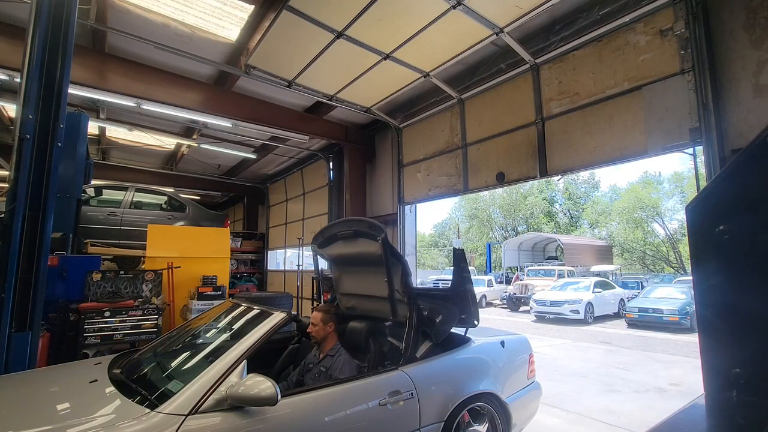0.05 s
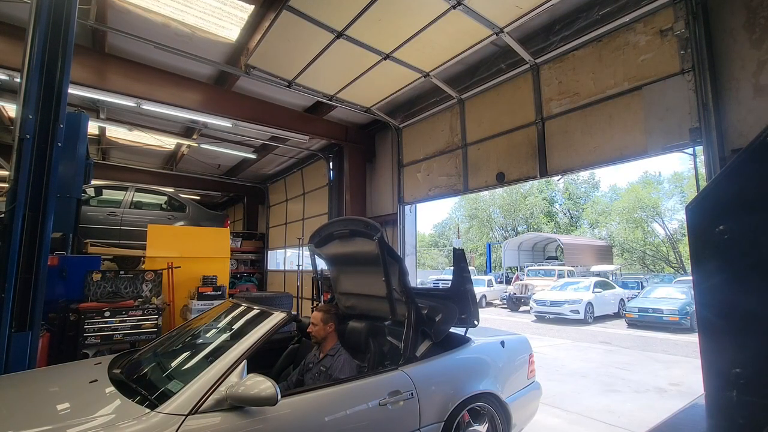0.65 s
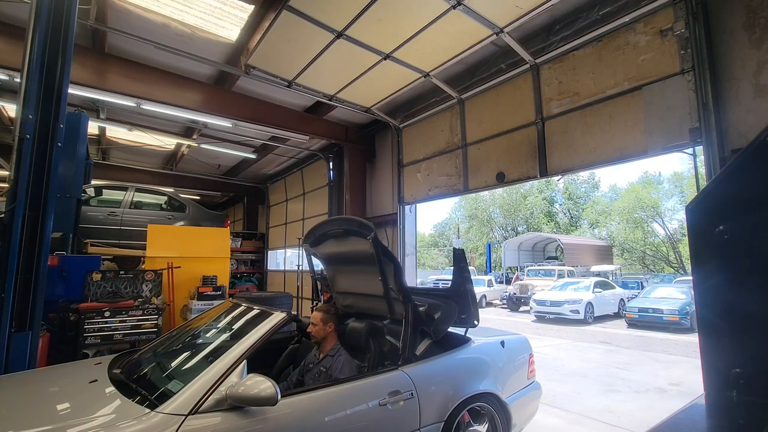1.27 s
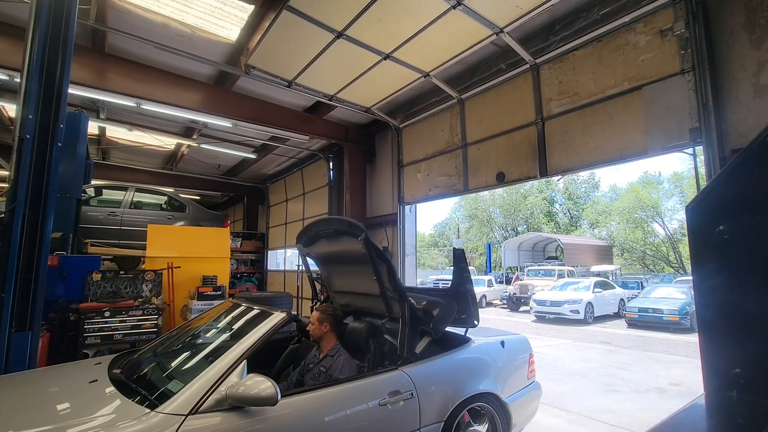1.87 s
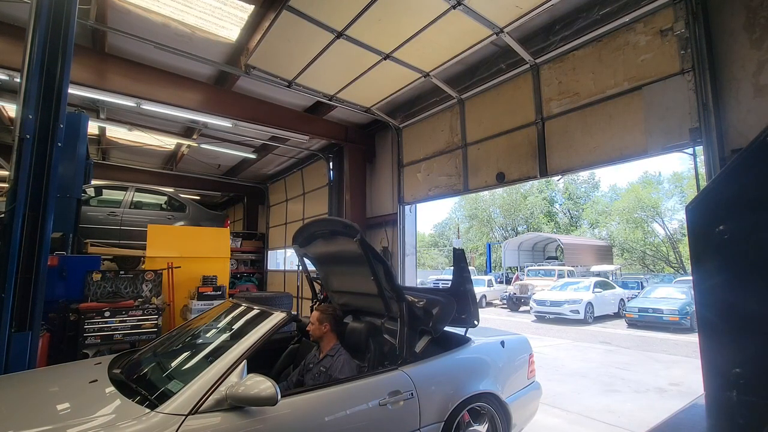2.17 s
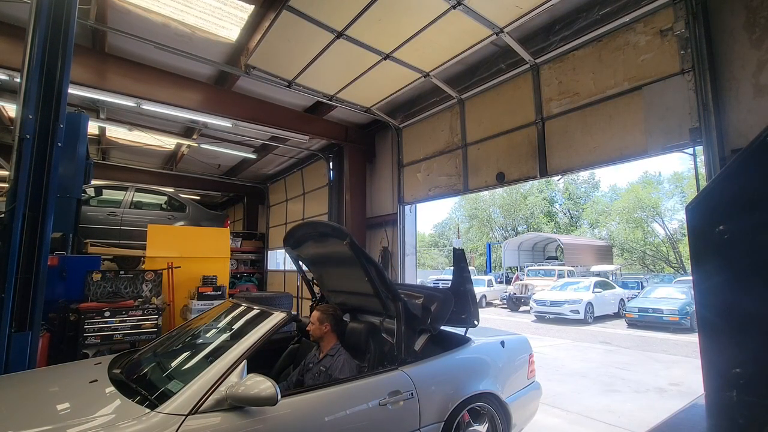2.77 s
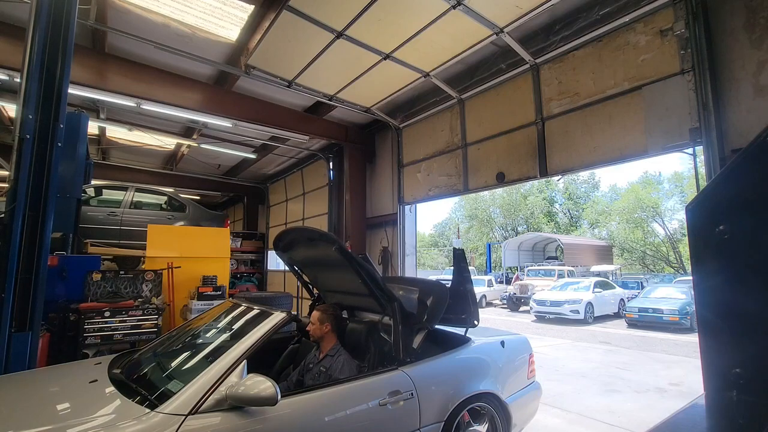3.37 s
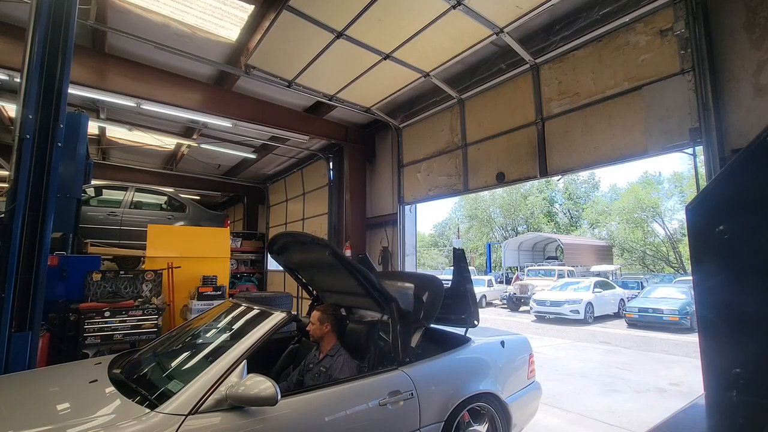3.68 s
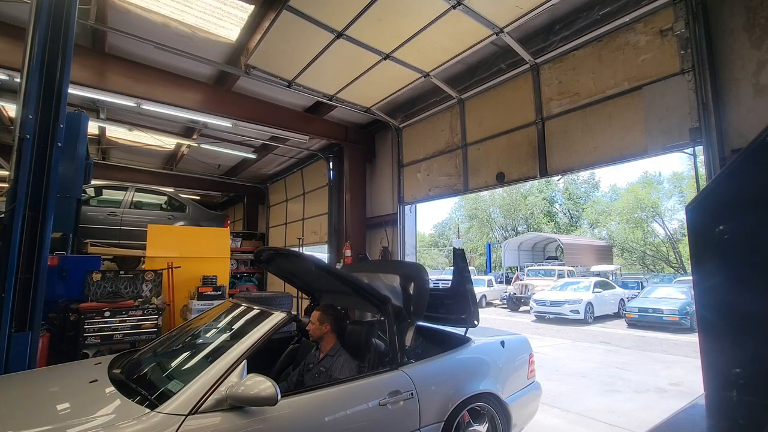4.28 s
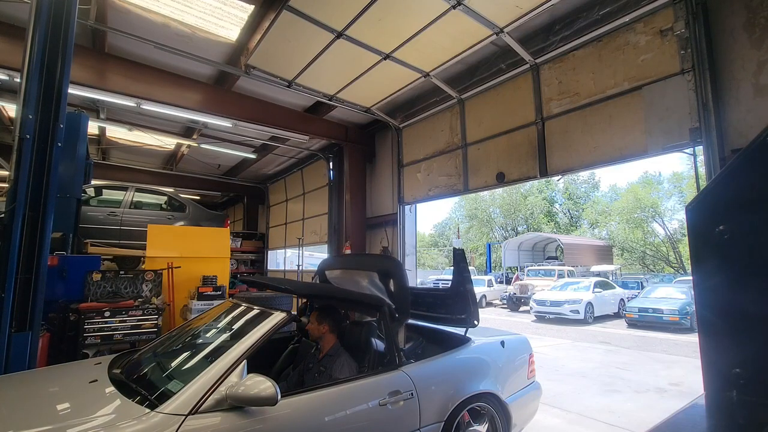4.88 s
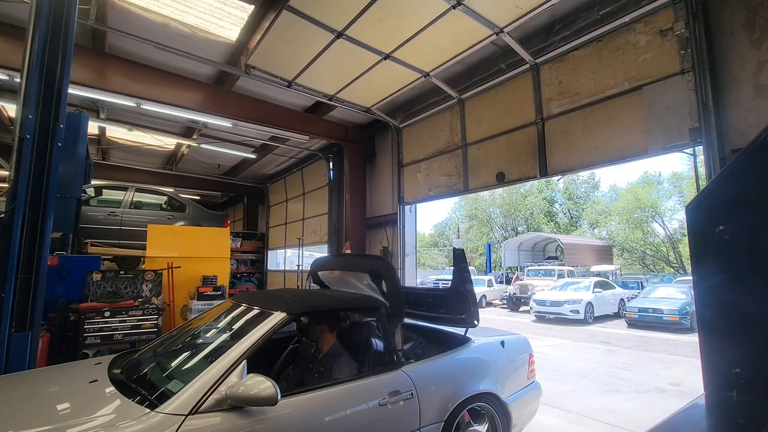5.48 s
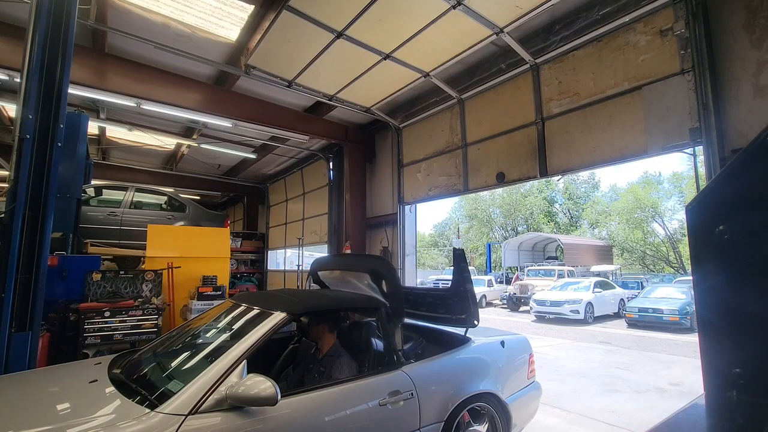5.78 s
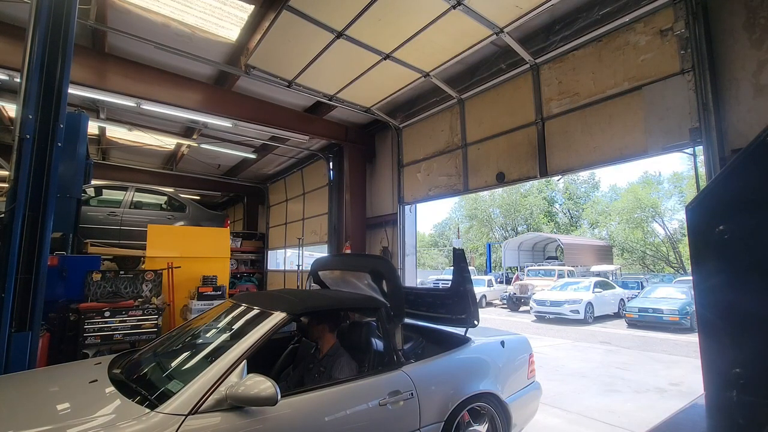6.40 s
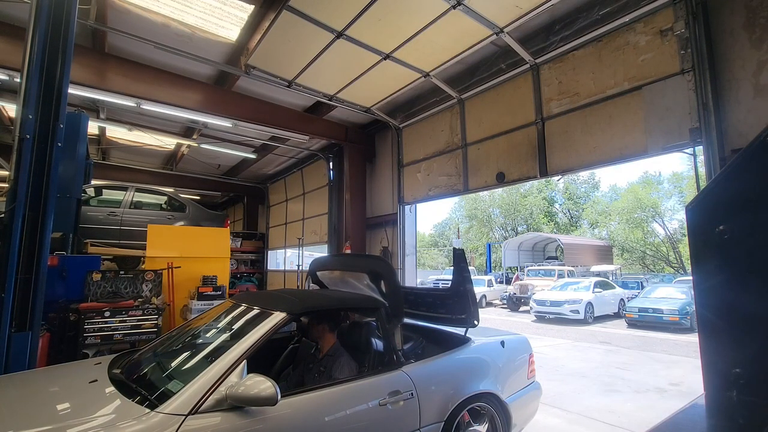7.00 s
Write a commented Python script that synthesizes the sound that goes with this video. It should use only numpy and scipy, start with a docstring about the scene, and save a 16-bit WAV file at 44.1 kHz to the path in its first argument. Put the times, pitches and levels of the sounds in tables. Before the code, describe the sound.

The low, loping rumble of an idling car fills a garage, heard from a few steps away with rushing fans and machine hum. A faint, high pump whine runs along as the convertible's roof swings shut, with one small hinge squeak. The roof then lands with a rattling thud, the latches click while the idle lifts slightly, and another clunk comes at the very end.

```python
"""An open workshop, where a convertible idles while its hydraulic soft top swings shut.
The V8 throbs and booms through its exhaust over a bed of fans, belts and mains hum.
The roof pump whines thinly on top; the canvas rustles and a hinge gives one faint squeak.
The front bow thuds onto the windscreen frame, the latches click while the pump changes load,
and a last clunk pulls the roof tight."""
import sys
import numpy as np
from scipy import signal
from scipy.fft import irfft
from scipy.io import wavfile
from scipy.ndimage import uniform_filter1d

SR = 44100
rng = np.random.default_rng(int(sys.argv[2]) if len(sys.argv) > 2 else 0)


def persist_wave(psi):
    """Save psi, clipped to +-1, as 16-bit WAV."""
    counts = np.round(np.clip(psi, -1, 1) * 32767).astype(np.int16)
    wavfile.write(sys.argv[1], SR, np.atleast_2d(counts).T)


N = 310905
TIME = np.arange(N) / SR

HALL_T60_S = 0.74
ROTOR_HZ = 62.66  # the pump's base speed
LATCHING_FROM_S, LATCHING_TO_S = 5.32, 6.335  # a valve sends the oil to the latches

# Steady exhaust tones. Each row: multiple of the crank rate (4 is the firing rate), level in dB.
ENGINE_ORDERS = [(4, -42.5), (6, -56), (7, -43.5), (8, -27.7), (9, -57), (11, -48), (12, -30.3), (13, -46),
                 (14, -55), (15, -45), (16, -45), (18, -53), (20, -57), (26, -58)]
# Unequal cylinders make the idle lope. Each row: multiple of the crank rate, depth from 0 to 1.
IDLE_LOPE = [(1, .12), (1.5, .11)]
# Exhaust and body resonances. Each row: pitch in Hz, width in Hz, level in dB, left over right in dB.
EXHAUST_MODES = [(56.4, 7.5, -52.5, -1), (76.4, 38, -39.5, 2), (97.4, 16, -48, -0.5), (143, 12.5, -41, -1),
                 (168.8, 14, -45.5, -2.5), (278, 9, -49, -23.5), (418.3, 13, -52, 2.5),
                 (552.1, 24, -53, -5), (848, 53, -52.5, 12.5), (1210, 110, -57.5, 0), (2077, 88, -69.5, 6)]
# The swell of the exhaust's boom. Each row: time in seconds, level in dB.
BOOM_LEVELS = [(0, -38), (.3, -39), (.7, -34), (1.25, -33.5), (1.45, -38.5), (2, -37.5), (2.45, -33.5),
               (2.85, -41), (3.35, -35), (3.75, -35.5), (4.05, -31), (4.25, -40), (4.7, -34), (5.3, -30.5),
               (5.65, -41), (6.1, -37), (7.05, -41)]
# Stereo width of the hall. Each row: frequency in Hz, left-right likeness (1 is mono).
HALL_LIKENESS = [(60, .99), (150, .97), (280, .72), (500, .5), (1000, .08), (2000, 0), (14000, 0)]
# Stereo lean of the hall. Each row: frequency in Hz, left over right in dB.
HALL_BALANCE = [(45, -.2), (87, -.9), (130, -2), (190, -3), (320, -6), (500, 1.5), (850, 3), (1300, .5),
                (2100, 3.5), (3000, 1), (5000, 1.5), (9000, 2), (10500, -2), (12000, -10), (15500, -8)]
# Colour of the fans and engine bay. Each row: frequency in Hz, relative level in dB.
FAN_COLOUR = [(20, -6), (40, -4), (65, 0), (100, -1), (190, 1.5), (330, -6), (560, -7), (1300, -13),
              (1470, -17), (1700, -15.5), (2400, -25.5), (3300, -30), (5500, -45), (9000, -49),
              (15500, -53.5)]
# Hum of the workshop's machines. Each row: pitch in Hz, level in dB, left over right in dB.
MACHINE_HUMS = [(120, -39.5, -2.5), (473, -59, -9), (1201, -65, 3), (1401, -69, -9)]
# Belts, pulleys and fan blades. Each row: pitch in Hz, width in Hz, level in dB.
WHIRR_TONES = [(393, 20, -59), (485, 30, -59), (660, 25, -62), (891, 10, -62), (947, 6, -58),
               (1018, 16, -62), (1092, 10, -61.5), (1147, 22, -61), (1255, 14, -63), (1402, 12, -63),
               (1565, 70, -67)]
# Pump whine, mostly at five strokes a turn. Each row: multiple of the rotor rate, free level in dB,
# loaded level in dB, left over right in dB, left-right likeness when free, likeness when loaded.
WHINE_LINES = [(10, -65, -63, 0, 0.9, 0.9), (15, -64, -68, 8, 0.6, 0.9), (20, -69, -61, 0, 0.4, 0.6),
               (25, -72, -70, 0, 0.1, -0.1), (30, -73, -81, 4, 0.2, -0.1), (40, -76, -75, 9, 0.9, 0.9),
               (55, -78, -81, 9, 0.9, 0.9), (60, -75, -80, -1, 0.1, -0.0), (65, -70.2, -70, 3, 0.4, 0.8),
               (70, -75, -73, 3, -0.6, -0.9), (75, -84, -87, 3, -0.4, -0.4), (80, -84, -83, 3, 0.4, -0.8),
               (85, -78, -73, 0, 0.1, 0.4), (90, -77.5, -74.5, -7, 0.3, -0.7),
               (95, -85, -84, 2, -0.1, -0.5), (100, -78.8, -90, 5, 0.7, -0.4),
               (104, -87, -93, -1, 0.9, 0.8), (105, -85, -79, 0, 0.0, 0.9), (110, -85, -99, 3, -0.3, -0.0),
               (115, -85, -79.5, 4, 0.2, 0.6), (120, -88, -83, 1, 0.1, 0.6), (130, -97, -85, 0, 0.1, 0.5),
               (135, -92, -86, 5, 0.4, -0.4), (140, -97, -90, 11, -0.5, 0.5), (145, -93, -92, 7, 0.4, 0.2),
               (150, -92, -93, 0, 0.0, 0.6), (165, -95, -89, -2, -0.5, -0.6),
               (170, -88, -90, -9, -0.2, -0.0), (175, -89, -94, -10, -0.1, -0.0),
               (180, -92, -97, -11, 0.2, 0.3)]
# The clearest whine lines, as multiples of the rotor rate.
CLEAR_LINES = (65, 70, 85, 100)
# They swell and dip as the roof travels. Each row: time in seconds, then a gain in dB for each line.
WHINE_SWELLS = [(0, 1, 0, 1, 3.5), (.48, 3, 3, 1.5, .5), (.68, -3, 3.5, -1, 2.5), (1.2, -1, 2, -1, 1.5),
                (1.45, -.5, 1, 0, -2), (1.65, 2, -3, 2, 2), (1.83, 1, -2, -2, -4), (2.08, -2, 1, -1, 1),
                (2.35, 1.5, -1, 4.5, .5), (2.57, -.5, -1, 1, -4), (2.75, -1, -6, -2, 1.5),
                (3.12, -3, -2, -4, 2.5), (3.42, -3, 3, -1, -2), (3.75, 3.5, -4, 3, .5),
                (4.2, 0, -2, 2.5, 0), (4.62, -2, 1, -2, -6), (5.12, 2.5, 1, -1, -3), (5.35, 1, 0, 0, 0),
                (6.3, 1, 0, 0, 0), (6.75, -3, 2, 0, -1)]
# Faint rotor buzz. Each row: frequency in Hz, level per line in dB.
BUZZ_COLOUR = [(3500, -86), (4500, -97.5), (6300, -96.5), (10000, -104), (13500, -105)]
# The canvas stretches, and brushes the seal. Each row: peak and half-length in seconds, level in dB.
CANVAS_RUSTLES = [(2.33, .05, -68), (4.53, .1, -70), (5.19, .06, -67), (6.6, .05, -70), (6.8, .06, -72)]
# Crisp colour of canvas and latch springs. Each row: frequency in Hz, relative level in dB.
CRISP_COLOUR = [(500, -10), (2000, 0), (4000, 0), (6000, -4), (9000, -14), (12500, -11), (15500, -14)]
# One hinge squeak: peak and half-length in seconds, pitch in Hz, level in dB.
HINGE_SQUEAK = (2.41, .036, 1030, -46.5)
# The roof frame knocks as it lands, and again as it is pulled tight.
# Each row: start in seconds, thud level in dB, brightness in Hz, rattle level in dB.
ROOF_KNOCKS = [(5.283, -28.5, 380, -54), (5.290, -29.5, 600, -51.5), (5.301, -28.5, 2000, -46.5),
               (5.311, -30, 1000, -45.5), (5.334, -38, 600, -62), (6.968, -37, 500, -75),
               (6.980, -27, 1000, -70), (6.995, -28.5, 1700, -66), (7.005, -31, 1500, -70),
               (7.017, -31.5, 900, -68)]
# The frame's ring. Each row: pitch in Hz, relative level in dB, 60 dB decay time in seconds.
FRAME_MODES = [(102, -4.5, 0.2), (205, -2, 0.15), (247.5, -1, 0.1), (275, -9, 0.1), (332, -8, 0.08),
               (372, -4, 0.06), (422, -6, 0.06), (480, -4, 0.08), (540, -10, .07), (590, -5, 0.07),
               (710, -12, 0.032), (834, -11.5, 0.05), (1052, -11.5, 0.04), (1200, -10, 0.06),
               (1330, -17, 0.06), (1676, -18, 0.05), (1940, -20, 0.035)]
# Colour of the loose linkage. Each row: frequency in Hz, relative level in dB.
RATTLE_COLOUR = [(200, 0), (700, 0), (1500, -4), (2500, -7), (3800, -6), (5500, -19), (9000, -29),
                 (12500, -27), (15500, -42)]
# A joint zings as the bow seats and the first latch bites. Each row: start in seconds, level in dB.
JOINT_ZINGS = [(5.287, -70), (5.305, -69.5), (5.535, -69.5)]
# The latches close. Each row: start in seconds, then clack, hook ring and spring snap levels in dB.
LATCH_HITS = [(5.535, -39, -39.5, -56.5), (5.602, -43.5, -44, -51.5), (6.982, -49, -38, -80),
              (7.003, -47, -43, -80)]
# Colour of the hooks' clack. Each row: frequency in Hz, relative level in dB.
CLACK_COLOUR = [(200, -15), (900, 1), (1900, 0), (2600, -8), (3300, -19), (8000, -38), (15500, -48)]
# The hooks' ring. Each row: pitch in Hz, relative level in dB, 60 dB decay time in seconds.
HOOK_MODES = [(1110, 0, .1), (1260, -1, .09), (1790, -7, .06), (2060, -8, .05), (2520, -12, .05)]
# Fixed peaks and dips that colour the treble. Each row: centre in Hz, width in Hz, gain in dB.
TREBLE_COLOUR = [(2284, 260, -4), (2550, 140, 1), (4060, 91, -1), (5700, 550, -4.5), (6300, 480, 2.5),
                 (8040, 310, -4), (8860, 540, 3.5), (9750, 450, -1.5), (11100, 1800, -4), (12500, 1200, 1)]


def from_db(db):
    """Decibels to gain."""
    return 10 ** (np.asarray(db) / 20)


def rms_one(x):
    """Scale to unit rms."""
    return x / np.sqrt(np.mean(x ** 2) + 1e-20)


def at_hz(points, hz):
    """Read a curve on a log-frequency axis."""
    freqs, values = np.transpose(points)
    return np.interp(np.log(hz), np.log(freqs), values)


def pan(db):
    """Left and right gains for a level difference."""
    return rms_one(from_db([[db / 2], [-db / 2]]))


def drift(rate_hz):
    """A smooth random wobble of about unit rms."""
    step, settle = 100, 1000
    r = np.exp(-2 * np.pi * rate_hz * step / SR)
    slow = signal.lfilter([1], [1, -2 * r, r * r], rng.standard_normal(N // step + settle + 2))[settle:]
    return np.interp(np.arange(N) / step, np.arange(len(slow)), rms_one(slow))


def switched(start, end, ramp_s):
    """0 outside a span and 1 inside it, with straight ramps centred on its ends."""
    return np.clip(.5 + np.minimum(TIME - start, end - TIME) / ramp_s, 0, 1)


def resonate(x, hz, width, passes=1):
    """A two-pole resonance with unit gain at its peak; more passes steepen the skirts."""
    r = np.exp(-np.pi * width / SR)
    poles = [1, -2 * r * np.cos(2 * np.pi * hz / SR), r * r]
    for _ in range(passes):
        x = signal.lfilter(np.array([1, 0, -1]) * (1 - r * r) / 2, poles, x)
    return x


def ring(clicks, hz, t60):
    """Each click sets a sine ringing."""
    r, w = from_db(-60 / (t60 * SR)), 2 * np.pi * hz / SR
    return signal.lfilter([0, np.sin(w)], [1, -2 * r * np.cos(w), r * r], clicks + 1e-18)


def strikes(times, levels_db):
    """One click for each contact."""
    clicks = np.zeros(N)
    clicks[np.clip(np.round(times * SR).astype(int), 0, N - 1)] = from_db(levels_db)
    return clicks


def fade(clicks, t60, attack_s=.0006):
    """An envelope that jumps up at each click and dies away."""
    envelope = signal.lfilter([1], [1, -from_db(-60 / (t60 * SR))], clicks + 1e-18)
    r = np.exp(-1 / (attack_s * SR))
    return signal.lfilter([1 - r], [1, -r], envelope)


def bandpass(x, low, high):
    """A gentle band filter, edges in Hz."""
    return signal.sosfilt(signal.butter(2, [low, high], "band", fs=SR, output="sos"), x)


def hall_noise(colour, flutter_db=1.2):
    """A fluttering wash of unit rms, near mono in the bass and wide on top."""
    out, edges = 0, np.geomspace(20, 17000, 25)
    white = rng.standard_normal((2, 2, N))
    for k, (low, high) in enumerate(zip(edges, edges[1:])):
        mid, side = bandpass(white[k % 2], low, high)
        hz = np.sqrt(low * high)
        alike = at_hz(HALL_LIKENESS, hz)
        gain = from_db(at_hz(colour, hz) + flutter_db * drift(8.7)) * pan(at_hz(HALL_BALANCE, hz))
        out += gain * (np.sqrt(1 + alike) * mid + np.sqrt(1 - alike) * side * [[1], [-1]])
    return rms_one(out)


def engine(turns, idle_up, unsteady_db=.85):
    """Four firings a turn: their regular part gives loping tones, their unevenness stirs the exhaust."""
    throb_db = -.24 - 3 * idle_up  # the faster idle throbs less
    lope = 1 + sum(depth * np.sin(2 * np.pi * (order * turns + rng.random()))
                   for order, depth in IDLE_LOPE)
    out = 0
    for order, db in ENGINE_ORDERS:
        tone = np.sqrt(2) * np.sin(2 * np.pi * (order * turns + rng.random()))
        side_db = at_hz(HALL_BALANCE, order * turns[-1] / TIME[-1])
        out += lope * tone * from_db(db + throb_db + unsteady_db * drift(3.9)) * pan(side_db)
    firings = np.diff(np.floor(4 * turns), prepend=0)
    for hz, width, db, side_db in EXHAUST_MODES:
        rumble = resonate(firings * rng.standard_normal(N), hz, width, passes=2)
        rumble /= np.sqrt(uniform_filter1d(rumble ** 2, SR // 2) + 1e-18)  # holds an even strength
        out += from_db(db) * rumble * pan(side_db)
    return out


def exhaust_boom(hz=165.65, wander_hz=1.23, trim_db=-1.5):
    """A cavity of the exhaust sings almost at one pitch, swelling and sinking."""
    phase = 2 * np.pi * np.cumsum(hz + wander_hz * drift(2.68)) / SR
    level_db = trim_db + np.interp(TIME, *np.transpose(BOOM_LEVELS))
    return np.sqrt(2) * np.sin(phase) * from_db(level_db) * pan(at_hz(HALL_BALANCE, hz))


def fans(turns, level_db=-37, pulsing=.014):
    """Rushing air that pulses a little with the firing."""
    rush = hall_noise(FAN_COLOUR, flutter_db=1.0)
    return from_db(level_db) * rush * (1 + pulsing * np.sin(8 * np.pi * turns))


def machine_hum():
    """The workshop's machines drone on fixed pitches."""
    return sum(np.sqrt(2) * np.sin(2 * np.pi * (hz * TIME + rng.random())) * from_db(db) * pan(side_db)
               for hz, db, side_db in MACHINE_HUMS)


def whirr():
    """Spinning parts give narrow, wavering tones, scattered by the hall to each ear."""
    out = 0
    for hz, width, db in WHIRR_TONES:
        tone = resonate(rng.standard_normal((2, N)), hz, width, passes=2)
        out += from_db(db) * rms_one(tone) * pan(at_hz(HALL_BALANCE, hz))
    return out


def pump(latching_extra_hz=.54, surge_hz=.21, settle_s=1.1, wander_hz=.025, buzz_dip_db=1):
    """One rotor drives whine and buzz; it surges as each travel begins and speeds up to latch."""
    load = switched(LATCHING_FROM_S, LATCHING_TO_S, ramp_s=.03)
    travel_s = np.where(TIME < LATCHING_TO_S, TIME, TIME - LATCHING_TO_S)
    rotor_hz = ROTOR_HZ + latching_extra_hz * load + surge_hz * (1 - load) * np.exp(-travel_s / settle_s)
    phase = 2 * np.pi * np.cumsum(rotor_hz + wander_hz * drift(6.9)) / SR
    return pump_whine(phase, load) + rotor_buzz(phase) * from_db(-buzz_dip_db * load)


def pump_whine(phase, load, trim_db=-.64):
    """Rotor harmonics shimmer at each ear as the moving roof shifts the echoes."""
    times, *levels = np.transpose(WHINE_SWELLS)
    swells = {multiple: np.interp(TIME, times, db) for multiple, db in zip(CLEAR_LINES, levels)}
    out = 0
    for multiple, free_db, loaded_db, side_db, free_alike, loaded_alike in WHINE_LINES:
        right_shift = np.arccos(free_alike + load * (loaded_alike - free_alike))
        angle = multiple * phase + 2 * np.pi * rng.random() + right_shift * [[0], [1]]
        shimmer = .19 if multiple in swells else .48
        echoes = shimmer * np.array([[drift(1.3), drift(1.3)] for ear in range(2)])
        echoes *= 1 - .55 * load  # the roof barely moves while it latches
        tone = (1 + echoes[:, 0]) * np.sin(angle) + echoes[:, 1] * np.cos(angle)
        level_db = free_db + load * (loaded_db - free_db) + swells.get(multiple, 0)
        out += rms_one(tone) * from_db(level_db + trim_db) * pan(side_db)
    return out


def rotor_buzz(phase, spread_db=2.5, size=8192):
    """The rotor rubs the same way on every turn: a comb of faint lines, looped as a wavetable."""
    hz = np.maximum(np.arange(size // 2 + 1), 1) * ROTOR_HZ
    db = at_hz(BUZZ_COLOUR, hz) + spread_db * rng.standard_normal((2, len(hz)))
    db += at_hz(HALL_BALANCE, hz) / 2 * np.array([[1], [-1]])
    in_band = (hz > BUZZ_COLOUR[0][0]) & (hz < BUZZ_COLOUR[-1][0])
    lines = from_db(db) * np.exp(2j * np.pi * rng.random(db.shape)) * in_band
    one_turn = irfft(lines, size) * size / np.sqrt(2)
    turns = phase / (2 * np.pi)
    return np.array([np.interp(turns, np.arange(size) / size, ear, period=1) for ear in one_turn])


def canvas(crinkle_db=3):
    """The stretching fabric gives soft, crinkly swishes."""
    envelope = sum(from_db(db) * np.exp(-.5 * ((TIME - peak_s) / half_s) ** 2)
                   for peak_s, half_s, db in CANVAS_RUSTLES)
    crinkle = rms_one(from_db(crinkle_db * drift(40)))
    return envelope * crinkle * hall_noise(CRISP_COLOUR)


def hinge(width_hz=32):
    """A pivot rubs briefly and sings at one pitch."""
    peak_s, half_s, hz, db = HINGE_SQUEAK
    rub = resonate(rng.standard_normal(N), hz, width_hz, passes=2)
    return from_db(db) * np.exp(-.5 * ((TIME - peak_s) / half_s) ** 2) * rms_one(rub)


def roof_clunks(spread_db=3.0, hall_db=-15):
    """The frame knocks on its rubber seal: each contact rings its modes and shakes the linkage."""
    thud = 0
    for start, thud_db, bright_hz, _ in ROOF_KNOCKS:
        knock = 0
        for hz, db, t60 in FRAME_MODES:
            late_s = rng.uniform(0, .00279, 1)  # the bow does not touch everywhere at once
            contact = strikes(start + late_s, thud_db + db + spread_db * rng.standard_normal())
            knock += ring(contact, hz, t60)
        thud += bandpass(knock, 80, bright_hz)
    starts, _, _, rattle_db = np.transpose(ROOF_KNOCKS)
    rattle = clatter(strikes(starts, rattle_db), RATTLE_COLOUR, t60=.14, tail_db=-13)
    return (thud + from_db(hall_db) * hall_tail(thud)) * pan(-4.5) + rattle


def clatter(clicks, colour, t60, tail_db):
    """A short burst of dense metal ringing, with its tail in the hall."""
    envelope = np.hypot(fade(clicks, t60), from_db(tail_db) * fade(clicks, HALL_T60_S))
    return envelope * hall_noise(colour)


def hall_tail(x):
    """The hall's echoes, wet only: eight feedback delays a side."""
    out = np.zeros((2, N))
    for k, lag in enumerate((rng.uniform(.014, .06, 16) * SR).astype(int)):
        loop, feedback = x.copy(), from_db(-60 * lag / SR / HALL_T60_S)
        for i in range(lag, N, lag):
            loop[i:i + lag] += feedback * loop[i - lag:i][:N - i]
        out[k % 2] += (loop - x) * (-1) ** (k // 2)
    return out


def joint_zing(hz=12500, width_hz=1800, t60=.22):
    """Steel slides on steel: a thin, very high ring that dies away."""
    starts, db = np.transpose(JOINT_ZINGS)
    rub = resonate(rng.standard_normal((2, N)), hz, width_hz, passes=2)
    return fade(strikes(starts, db), t60) * rms_one(rub) * pan(at_hz(HALL_BALANCE, hz))


def latches(rebound_s=.015, rebound_db=-9):
    """The hooks clack into the windscreen frame and their springs snap over; each rebounds once."""
    rebounds = np.array(LATCH_HITS) + [rebound_s, rebound_db, rebound_db, rebound_db]
    starts, clack_db, hook_db, snap_db = np.vstack([LATCH_HITS, rebounds]).T
    clack = clatter(strikes(starts, clack_db), CLACK_COLOUR, t60=.1, tail_db=-12)
    hooks = sum(ring(strikes(starts, hook_db + db), hz, t60) for hz, db, t60 in HOOK_MODES)
    snap = clatter(strikes(starts, snap_db), CRISP_COLOUR, t60=.09, tail_db=-15)
    return clack + hooks + snap


def scene(idle_rpm=651, hunt_rpm=5, hunt_period_s=3.2, idle_up_rpm=26):
    """The closing roof over a bed of engine and workshop; the idle governor hunts slowly."""
    idle_up = switched(5.44, 6.28, ramp_s=.24)  # the engine runs a little faster during latching
    hunting = hunt_rpm * np.cos(2 * np.pi * (TIME - .5) / hunt_period_s)
    rpm = idle_rpm + hunting * (1 - idle_up) + idle_up_rpm * idle_up
    turns = np.cumsum(rpm) / 60 / SR
    bed = engine(turns, idle_up) + exhaust_boom() + fans(turns) + machine_hum() + whirr()
    return bed + pump() + hinge() + canvas() + roof_clunks() + latches() + joint_zing()


def record(dry, cutoff_hz=15550):
    """Fixed peaks and dips colour the treble; the top is cut steeply."""
    for hz, width, db in TREBLE_COLOUR:
        dry = dry + (from_db(db) - 1) * resonate(dry, hz, width)
    return signal.sosfilt(signal.ellip(10, .1, 80, cutoff_hz, fs=SR, output="sos"), dry)


dry = scene()
out = record(dry)
persist_wave(out)
```